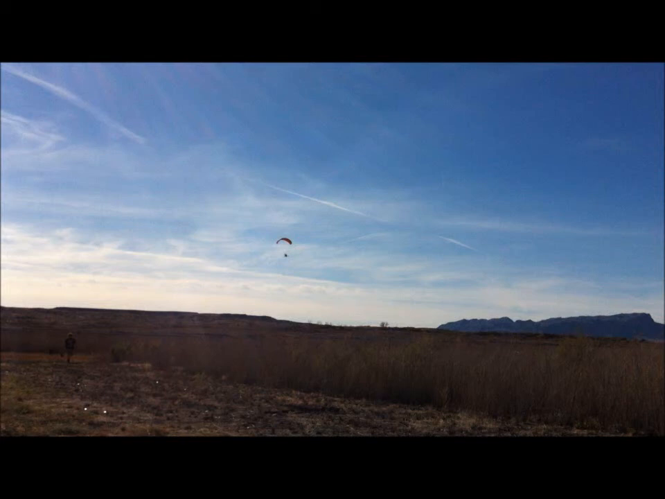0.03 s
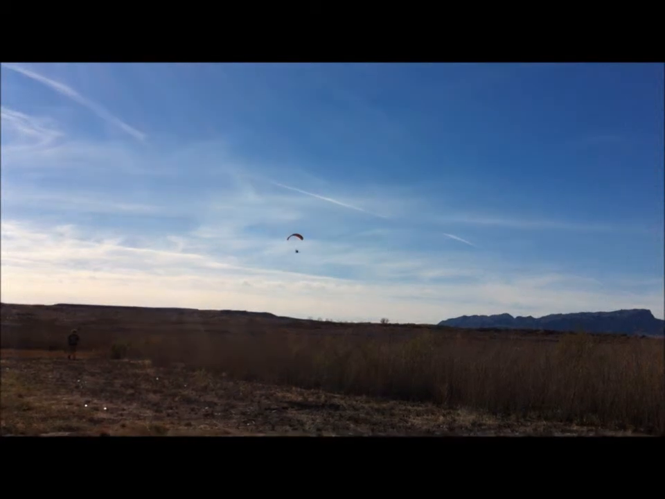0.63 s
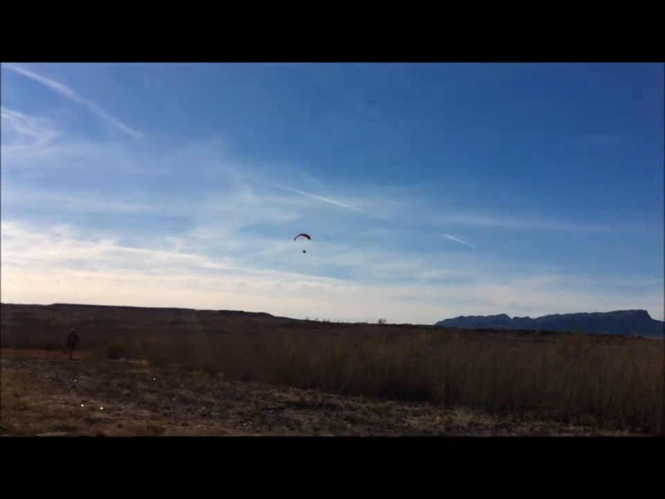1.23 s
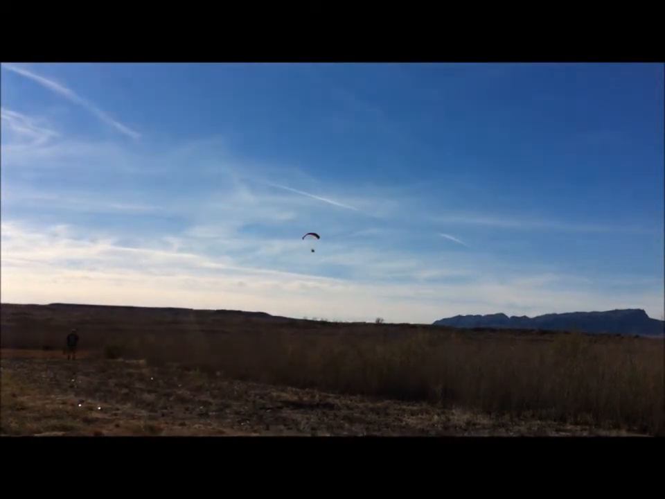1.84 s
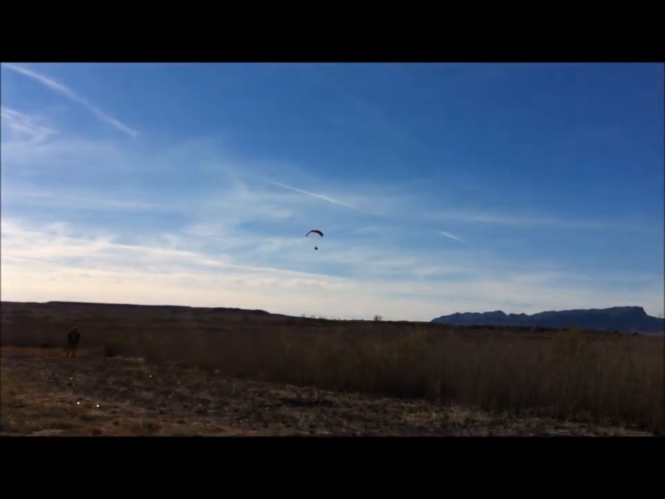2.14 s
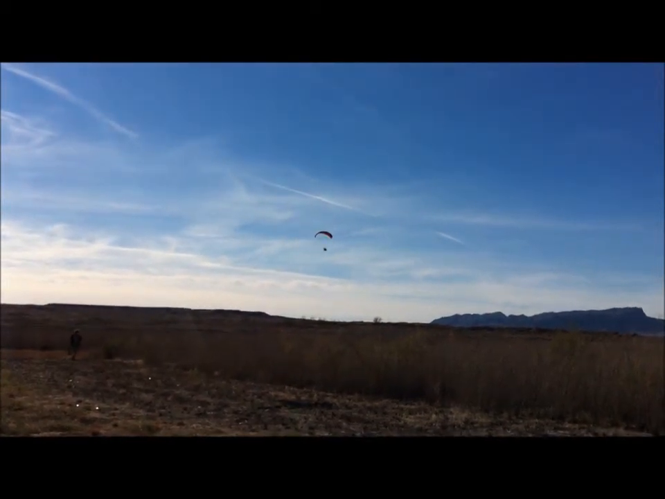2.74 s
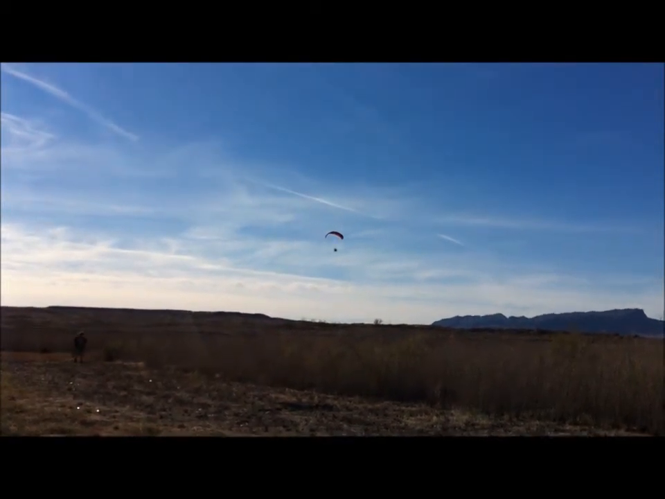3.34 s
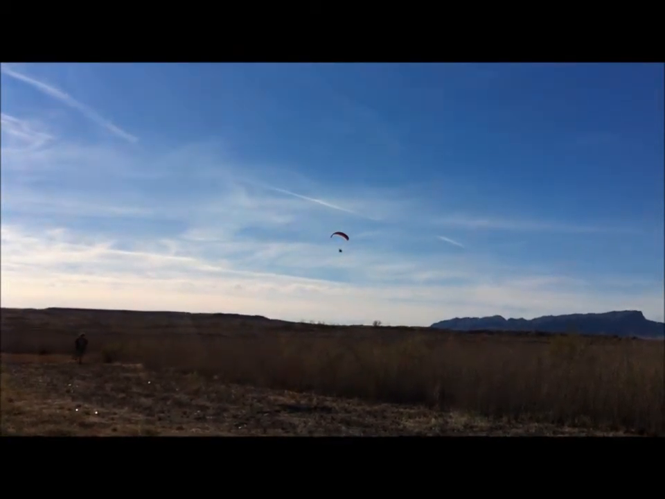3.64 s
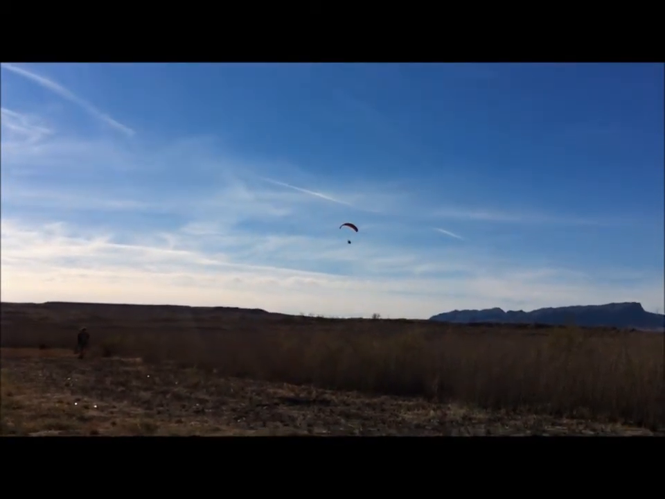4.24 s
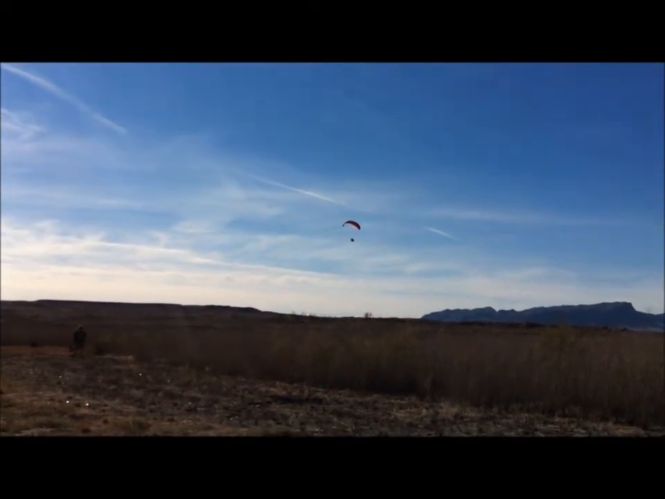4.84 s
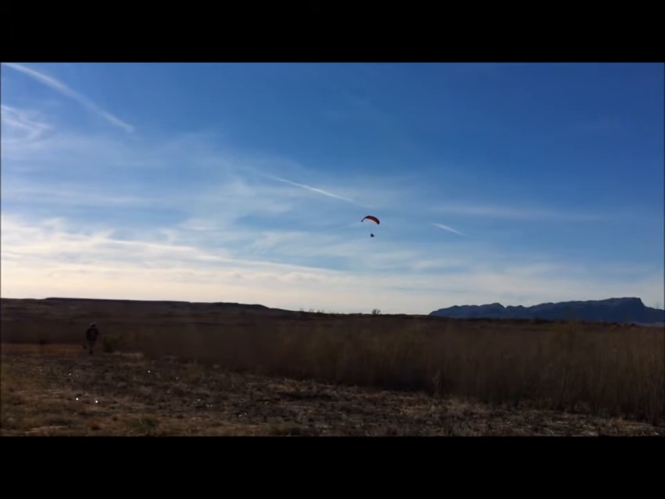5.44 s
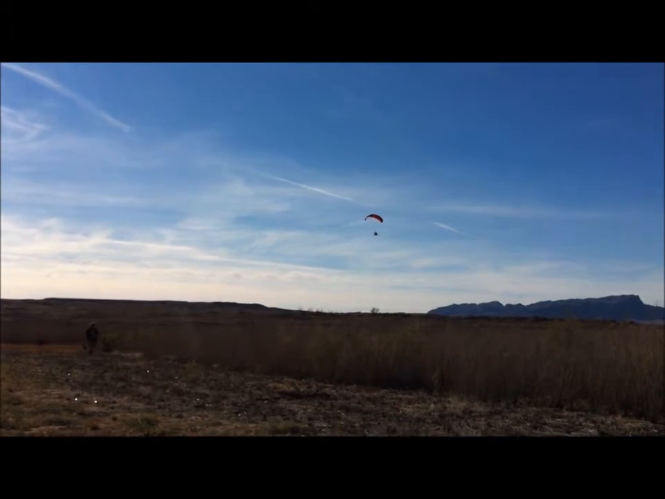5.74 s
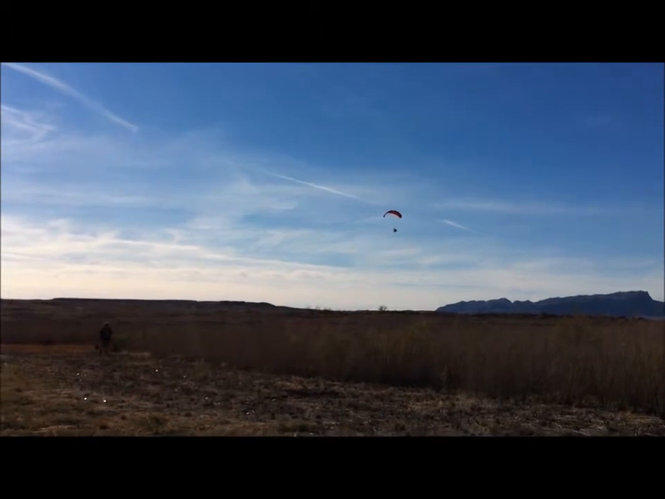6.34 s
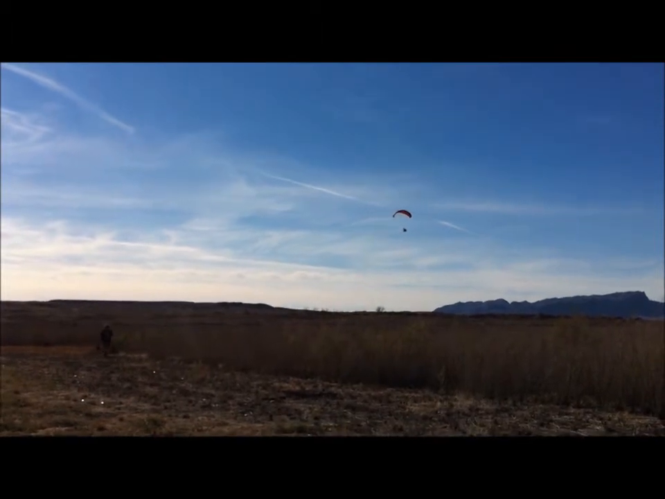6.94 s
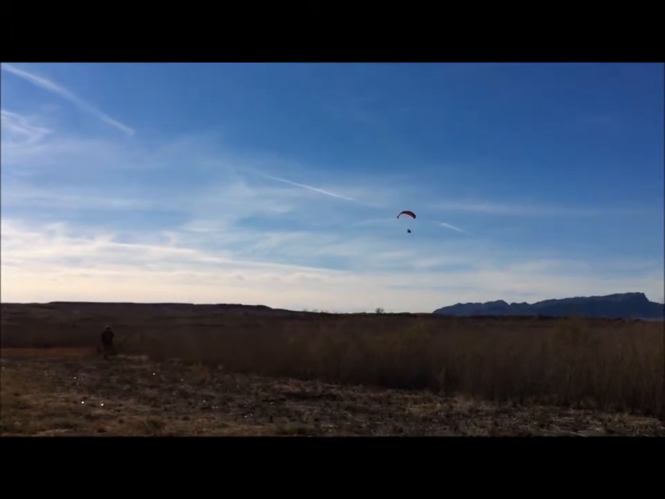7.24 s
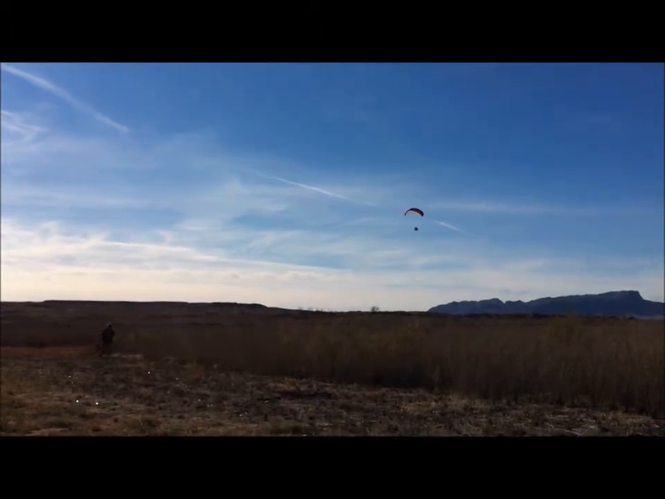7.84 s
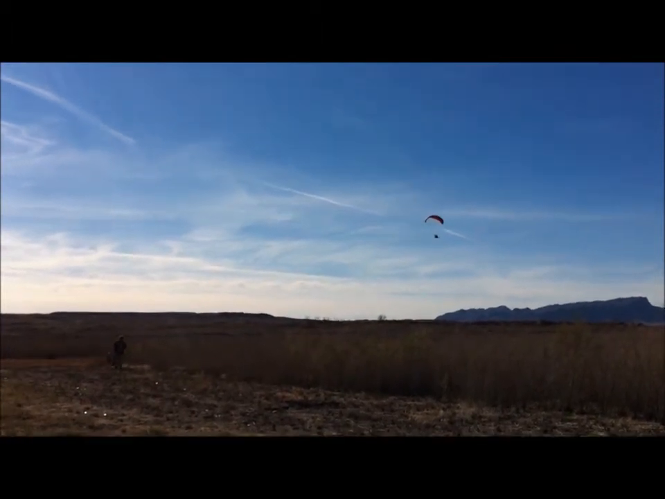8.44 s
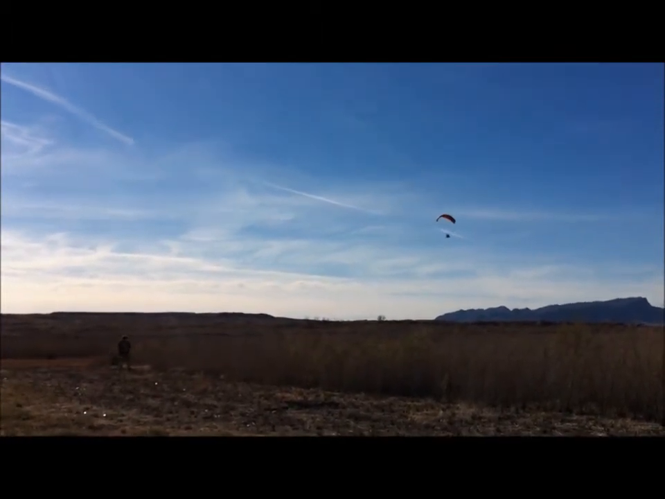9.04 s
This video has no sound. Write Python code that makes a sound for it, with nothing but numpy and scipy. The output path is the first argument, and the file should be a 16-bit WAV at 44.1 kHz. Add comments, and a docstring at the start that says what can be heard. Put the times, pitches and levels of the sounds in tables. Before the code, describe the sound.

The far-off buzz of a paraglider's small engine and propeller wavers outdoors, with low wind rumbles and faint clicks.

```python
"""Open scrub, with a powered paraglider droning far off; near the end it opens its throttle a little.
Its two-stroke exhaust and its geared-down propeller are two harmonic series that beat against each other.
Refraction in moving air fades bands in and out, and the ground reflection cancels one falling band.
Close by, gusts buffet the microphone, and a hand-held camera ticks and rustles over a faint hiss."""
import sys
import numpy as np
from scipy import signal
from scipy.fft import rfft, irfft, next_fast_len
from scipy.io import wavfile

SR = 44100
rng = np.random.default_rng(int(sys.argv[2]) if len(sys.argv) > 2 else 0)


def put_to_file(sound):
    """Save the sound as 16-bit audio at rate SR, in the file named by the first command-line argument."""
    columns = np.atleast_2d(sound).T  # one column per channel
    safe = np.clip(columns, -1, 1)
    whole_steps = np.round(safe * 32767)
    wavfile.write(sys.argv[1], SR, whole_steps.astype(np.int16))


N = 405719
TIME = np.arange(N) / SR


def amp(db):
    """Amplitude ratio: tenfold for every 20 dB."""
    return 10 ** (np.asarray(db) / 20)


def unit_rms(x):
    """Normalisation to unit mean power."""
    return x / np.sqrt(np.mean(x ** 2) + 1e-20)


def bell(x, centre, half_width):
    """Gaussian curve of height 1."""
    return np.exp(-((x - centre) / half_width) ** 2)


def add(mix, start_s, sound):
    """Superposition: a sound sums into the mix from its start time."""
    part = mix[max(round(start_s * SR), 0):][:len(sound)]
    part += sound[:len(part)]


def noise(spectrum):
    """Spectral shaping: white noise coloured by a curve over log frequency, at rms 1."""
    size = next_fast_len(N)
    hz, db = np.transpose(spectrum)
    colour = amp(np.interp(np.log(np.fft.rfftfreq(size, 1 / SR) + 1), np.log(hz), db))
    return unit_rms(irfft(rfft(rng.standard_normal(size)) * colour, size)[:N])


def wander(corner_hz):
    """Random modulation: low-pass noise of rms 1."""
    size = 8192
    hz = np.fft.rfftfreq(size, TIME[-1] / size)
    slow = irfft(rfft(rng.standard_normal(size)) / np.sqrt(1 + (hz / corner_hz) ** 4))
    return unit_rms(np.interp(TIME, np.linspace(0, TIME[-1], size), slow - slow.mean()))


# Noise floor of the microphone: (frequency [Hz], relative spectral level [dB])
HISS_SPECTRUM = [(20, -10), (1000, 5), (3200, 1.5), (5500, 0.5), (8500, -1), (10500, -2.5), (13000, -2),
                 (16000, -1)]
def hiss():
    """Self-noise: the microphone adds a steady broadband floor."""
    return amp(-65.5) * noise(HISS_SPECTRUM)


# Skin rubbing on the case: (frequency [Hz], relative spectral level [dB])
SKIN_SPECTRUM = [(1500, -19), (3500, -3), (5500, 0), (7500, -9), (15000, -22)]
# Shifts of the hand: (time [s], half length [s], level [dB])
HAND_STROKES = [(7.82, 0.09, -71), (8.18, 0.06, -70.5)]
def rustle():
    """Friction: skin slides over the camera in faint, grainy strokes."""
    level = sum(amp(db) * bell(TIME, s, half_s) for s, half_s, db in HAND_STROKES)
    return level * noise(SKIN_SPECTRUM) * unit_rms(amp(4.5 * wander(60)))


# Clicks of the camera: (time [s], base level [dB], ring frequency [Hz], ring level over base [dB])
CASE_TICKS = [(0.193, -45, 1390, 17), (.232, -49, 2500, -5), (1.246, -43, 2550, -5),
              (1.7724, -43, 5030, -12), (4.0405, -39, 3800, -6), (4.233, -34.5, 4300, -10),
              (4.8462, -48, 9000, -8), (5.4222, -38, 2800, -6), (5.7656, -39.5, 5550, -15),
              (7.0955, -45, 5000, -12)]
def ticks(snap_t60_s=0.018, ring_t60_s=0.0092):
    """Damped free vibration: each dry snap leaves the plastic case ringing briefly."""
    out, t = np.zeros(N), np.arange(2048) / SR
    for s, db, hz, ring_db in CASE_TICKS:
        snap = rng.standard_normal(len(t)) * amp(-8.5 - 60 * t / snap_t60_s)
        ring = np.sin(2 * np.pi * hz * t) * amp(ring_db - 60 * t / ring_t60_s)
        add(out, s, amp(db) * (snap + ring))
    return out


# Wind pressure on the microphone: (frequency [Hz], relative spectral level [dB])
WIND_SPECTRUM = [(20, -51), (45, -30), (80, -8.5), (130, 0), (180, 3), (260, -6.5), (380, -10),
                 (550, -23.5), (1000, -29.5), (2500, -56)]
# Gusts: (start [s], duration [s], level [dB])
WIND_GUSTS = [(.1, 0.079, -43), (.22, 0.16, -48.5), (1.748, .12, -47), (4.61, .05, -46.5),
              (5.25, 0.16, -44), (5.53, 0.22, -41.5), (5.75, .52, -40), (6.457, 0.1, -51), (6.95, .35, -53),
              (8.028, 0.03, -35.5), (8.415, 0.19, -43.5), (8.645, .55, -44)]
def wind(breeze_db=-58, rise_s=0.035, fall_s=0.021):
    """Turbulent pressure fluctuation: a light breeze rumbles, and gusts rise, hold and drop."""
    level = np.full(N, amp(breeze_db))
    for s, duration, db in WIND_GUSTS:
        before, after = np.maximum(s - TIME, 0), np.maximum(TIME - s - duration, 0)
        level = np.maximum(level, amp(db) * np.exp(-before / rise_s - after / fall_s))
    return level * noise(WIND_SPECTRUM) * unit_rms(amp(1.6 * wander(8.4)))


# Single eddies striking the microphone: (time [s], relative level [dB], frequency [Hz])
EDDIES = [(1.812, -36, 171), (3.409, -33, 135), (3.958, -37, 210), (5.322, -27, 188), (5.387, -31, 163),
          (5.42, -26.5, 320), (5.529, -17.5, 212), (5.597, -23, 258), (5.665, -22, 177), (5.754, -15, 165),
          (5.872, -18.5, 177), (5.995, -24, 189), (6.068, -22, 232), (6.185, -24.5, 255), (6.258, -24, 164),
          (7.288, -34, 148), (7.56, -37.5, 149), (7.999, -30, 168), (8.022, -25.5, 130), (8.044, -21, 149),
          (8.42, -30, 222), (8.618, -24.5, 198), (8.721, -29, 200), (8.781, -24, 172), (8.885, -27, 220)]
def buffets(decay_cycles=0.64, delay_s=0.002, low_cut_hz=116):
    """Pressure transients: each eddy gives one brief low swing; the microphone passes no deep bass."""
    out, t = np.zeros(N), np.arange(-0.02, 0.04, 1 / SR)
    for s, db, hz in EDDIES:
        swing = np.cos(2 * np.pi * (hz * t * (1 - 6 * t) + rng.random()))
        add(out, s + delay_s + t[0], amp(db) * swing * np.exp(-abs(t) * hz / decay_cycles))
    ragged = out * (1 + 0.42 * wander(176))
    low_cut = signal.butter(3, low_cut_hz, "highpass", fs=SR, output="sos")
    return amp(1.5) * signal.sosfilt(low_cut, ragged)


# Bands bent toward the listener or away:
# (time [s], half length [s], centre [Hz], half width [Hz], gain [dB])
REFRACTION = [(.3, 0.3, 940, 300, 2.5), (.42, 0.46, 1440, 110, 8), (.42, .15, 2350, 250, 8),
              (.9, .3, 2130, 169, -4), (1.99, 0.38, 1970, 640, 6.5), (2.95, 0.45, 423, 220, -4),
              (3, 0.47, 1920, 260, 5), (3.05, 0.35, 1300, 130, -8), (3.83, .2, 820, 170, 3.5),
              (3.998, 0.5, 1220, 217, 8), (3.952, 0.32, 2260, 450, 6.5), (4.623, .17, 2040, 600, -5.5),
              (4.78, 0.21, 830, 340, 5.5), (5.45, 0.61, 2200, 770, 5), (7.456, 0.49, 1000, 900, -1),
              (8.1, 0.58, 2560, 503, 5.5), (8.398, .55, 1270, 150, 6.5)]
# Band cancelled by the ground reflection, sinking and filling in: (time [s], centre [Hz], depth [dB])
GROUND_NOTCH = [(.15, 1980, -0.5), (.56, 1740, 6), (.74, 1170, 8.5), (.87, 980, 11.5), (1.15, 820, 7),
                (1.8, 660, 2.5), (2.4, 640, 0)]
# One band that stays weak throughout: (centre [Hz], half width [Hz], depth [dB])
WEAK_BAND = (1440, 98, 4.2)
def through_air(x, approach_db_per_s=0.5, steady_below_hz=230, notch_half_width_hz=295):
    """Outdoor propagation: spreading, refraction, ground interference and absorption shape the drone."""
    hz, t, spectra = signal.stft(x, SR, nperseg=1024, noverlap=768)
    hz = hz[:, None]
    above_bass = 1 - np.exp(-(hz / steady_below_hz) ** 4)
    gain_db = approach_db_per_s * (t - t.mean()) * above_bass
    for s, half_s, centre_hz, half_hz, db in REFRACTION:
        gain_db += db * bell(t, s, half_s) * bell(hz, centre_hz, half_hz)
    times, *columns = np.transpose(GROUND_NOTCH)
    notch_hz, depth_db = (np.interp(t, times, column) for column in columns)
    gain_db -= depth_db * bell(hz, notch_hz, notch_half_width_hz)
    weak_hz, weak_half_hz, weak_db = WEAK_BAND
    gain_db -= weak_db * bell(hz, weak_hz, weak_half_hz)
    cutoff_hz = 1890 + 51.5 * t  # the air absorbs less treble as the glider nears
    low_pass = 1 / np.sqrt(1 + (hz / cutoff_hz) ** 18.6)
    return signal.istft(spectra * low_pass * amp(gain_db), SR, nperseg=1024, noverlap=768)[1][:N]


def pulse_train(cycles, harmonics, fade_db, jitter_rad, echo_rad):
    """Fourier series of one pulse a cycle: echoes spread the phases, turbulence shakes level and phase."""
    out = np.zeros(N)
    for order, db in harmonics:
        shake = np.sqrt(order / len(harmonics))  # short waves are shaken most
        level = amp(db) * unit_rms(amp(fade_db * shake * wander(0.94)))
        phase = echo_rad * rng.standard_normal() + jitter_rad * shake * wander(1.87)
        out += level * np.sin(2 * np.pi * order * cycles + phase)
    return np.sqrt(2) * out


# Rush of air off the blades: (frequency [Hz], relative spectral level [dB])
SWISH_SPECTRUM = [(60, -35), (130, -6), (250, -6.5), (450, 0.5), (650, -1.5), (900, 4.5), (1150, -4.5),
                  (1420, -4.5), (1850, -4.5), (2200, -6.5), (2600, -6.5), (3200, -15.5)]
def blade_swish(passes, rise_cycles=0.088, fall_cycles=0.28, floor=0.56):
    """Amplitude-modulated turbulence: the noise bursts at each blade passage, then dies down."""
    age = (passes + rise_cycles / 2) % 1
    burst = np.minimum(age / rise_cycles, 1) * np.exp(-np.maximum(age - rise_cycles, 0) / fall_cycles)
    envelope = unit_rms((floor + burst) * amp(1.53 * wander(40)))
    return amp(-48.5) * envelope * noise(SWISH_SPECTRUM)


# Propeller tones: (multiple of the blade rate, relative level [dB])
BLADE_HARMONICS = [(1, -76), (2, -52.5), (3, -58.5), (4, -59), (5, -55.5), (6, -57.5), (7, -56.5),
                   (8, -63.5), (9, -61.5), (10, -52.5), (11, -53), (12, -76), (13, -71.5), (14, -71.5),
                   (15, -67.5), (16, -63.5), (17, -65.5), (18, -76), (19, -75), (20, -72), (21, -70),
                   (22, -82), (23, -76), (24, -74), (25, -73), (26, -73.5)]
# The propeller's beam swings toward the listener as the glider turns: (time [s], gain [dB])
DIRECTIVITY = [(.15, -3), (3.45, -3.3), (3.8, 1.5), (4.3, -5), (4.8, -1), (5.8, 0.6), (6.5, -1.6),
               (7.6, -.7), (9.2, -0.5)]
def propeller(passes):
    """Rotational noise: two slightly unequal blades slap the air, each dragging a puff of turbulence."""
    slaps = pulse_train(passes, BLADE_HARMONICS, fade_db=4.0, jitter_rad=0.7, echo_rad=0.072)
    imbalance = 0.053 * np.cos(np.pi * passes)
    slaps *= 1 + imbalance + 0.06 * wander(32)
    beam = amp(np.interp(TIME, *np.transpose(DIRECTIVITY)))
    return beam * slaps + blade_swish(passes)


def silencer(x, ring_hz=870, width_hz=183):
    """Group delay: an all-pass resonance holds one band back, so each pop trails a short ring."""
    radius = np.exp(-np.pi * width_hz / SR)
    denominator = [1, -2 * radius * np.cos(2 * np.pi * ring_hz / SR), radius ** 2]
    return signal.lfilter(denominator[::-1], denominator, x)


# Exhaust tones: (multiple of the firing rate, relative level [dB])
EXHAUST_HARMONICS = [(1, -65.5), (2, -51.5), (3, -56), (4, -56), (5, -51.5), (6, -56.5), (7, -62),
                     (8, -58.5), (9, -60.5), (10, -61.5), (11, -58), (12, -76.5), (13, -77), (14, -66),
                     (15, -66.5), (16, -62.5), (17, -66.5), (18, -66), (19, -64), (20, -69), (21, -75),
                     (22, -73.5), (23, -69.5), (24, -72.5), (25, -74), (26, -82), (27, -72.5), (28, -74)]
# Sum and difference tones: (multiple of the firing rate, multiple of the shaft rate, relative level [dB])
CHOP_SIDEBANDS = [(2, 2, -61.5), (4, -3, -65), (4, -1, -62), (4, 1, -67), (5, 1, -71), (7, -1, -63.5),
                  (7, 1, -65.5)]
def exhaust(firings, shaft_turns):
    """Modulation sidebands: the turning propeller chops a train of uneven two-stroke pops."""
    pops = pulse_train(firings, EXHAUST_HARMONICS, fade_db=2.4, jitter_rad=0.55, echo_rad=0.35)
    for firing_order, shaft_order, db in CHOP_SIDEBANDS:
        cycles = firing_order * firings + shaft_order * shaft_turns + rng.random()
        pops += np.sqrt(2) * amp(db + 2 * wander(2)) * np.cos(2 * np.pi * cycles)
    strength = 1 + 0.12 * wander(56)
    return amp(-0.99) * silencer(pops * strength)


# Engine speed, drifting about cruise and then throttled up: (time [s], firing rate [Hz])
ENGINE_SPEED = [(.2, 91.38), (.8, 91.36), (1.15, 91.73), (1.9, 91.75), (2.6, 91.49), (3.1, 91.52),
                (3.8, 91.23), (4.55, 90.82), (5.2, 91.64), (5.6, 91.86), (6, 92.32), (6.43, 92.51),
                (7, 91.89), (7.52, 91.43), (7.85, 91.9), (8.28, 94.42), (8.56, 95.14), (9.1, 94.94)]
def paraglider(blades_per_firing=0.8454):
    """Beating: a belt locks propeller to engine at a fixed ratio, and their nearby harmonics interfere."""
    flutter = 0.0005 * wander(8)
    firing_hz = np.interp(TIME, *np.transpose(ENGINE_SPEED)) * (1 + flutter)
    firings = np.cumsum(firing_hz) / SR
    passes = blades_per_firing * firings
    drone = exhaust(firings, shaft_turns=passes / 2) + propeller(passes)
    return amp(-0.5) * through_air(drone)


def scene():
    """Superposition: breeze, camera and glider sum at one microphone."""
    breeze = wind() + buffets()
    camera = ticks() + rustle() + hiss()
    return (breeze + camera + paraglider())[None]


def record(dry, onset_s=0.119, cutoff_hz=15900):
    """Gating and band limiting: the sound starts after a moment of silence and loses its top treble."""
    gated = dry * (TIME >= onset_s)
    low_pass = signal.firwin(511, cutoff_hz, window=("kaiser", 9), fs=SR)
    return signal.oaconvolve(gated, low_pass[None], "same")


dry = scene()
out = record(dry)
put_to_file(out)
```